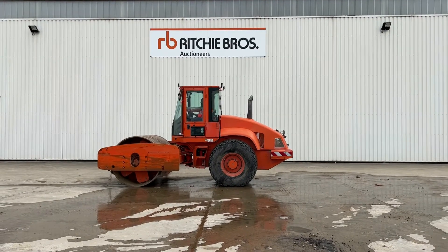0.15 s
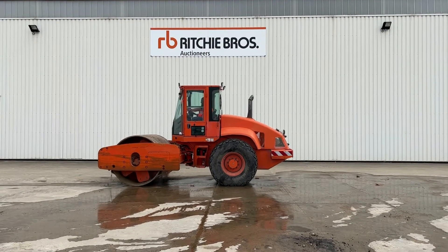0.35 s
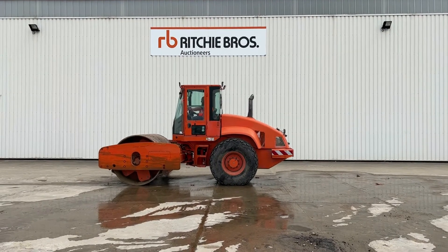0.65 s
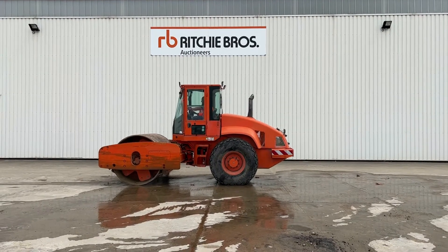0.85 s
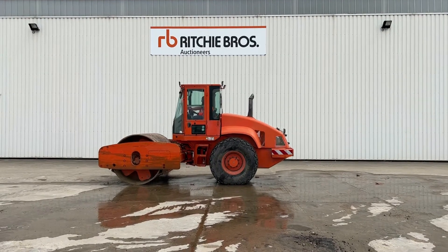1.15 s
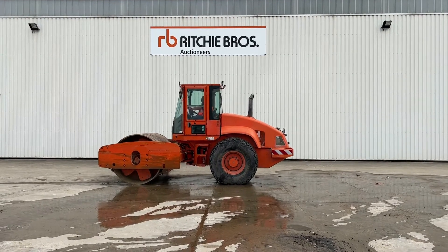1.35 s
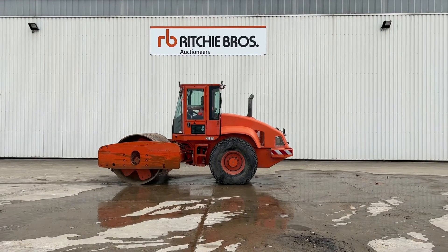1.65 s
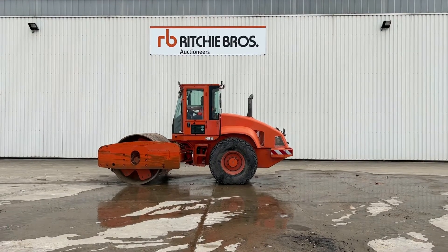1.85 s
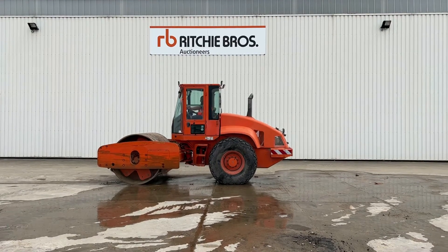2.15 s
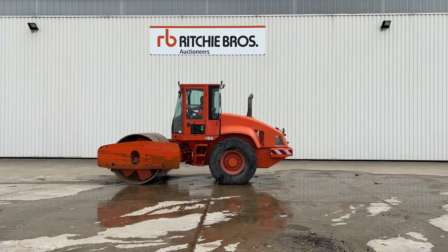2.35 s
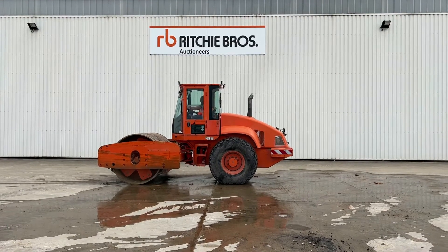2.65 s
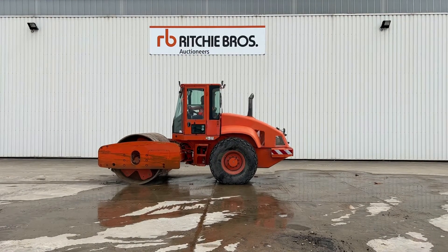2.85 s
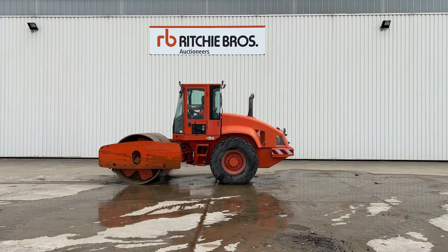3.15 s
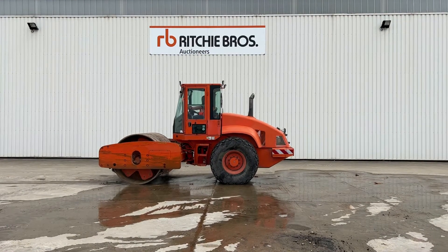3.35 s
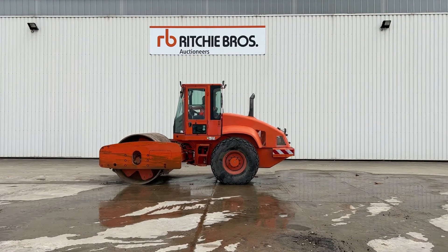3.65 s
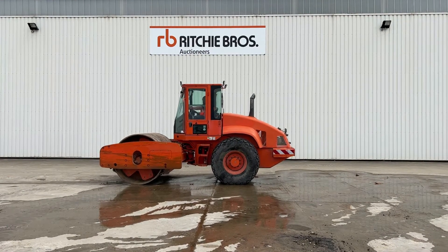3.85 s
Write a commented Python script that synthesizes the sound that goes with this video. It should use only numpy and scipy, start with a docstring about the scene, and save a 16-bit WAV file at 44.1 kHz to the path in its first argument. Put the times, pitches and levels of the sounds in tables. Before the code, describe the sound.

A road roller's steel drum rumbles, rings and clanks across gritty wet concrete outdoors, over a throbbing diesel engine and a thin pump whine. Near the end a stone snaps and the rolling fades to a quiet, humming idle.

```python
"""A heavy roller creeps across a wet concrete yard and stops. From the start, grit shakes its steel drum
so that it rumbles, grinds and rings, while the diesel engine knocks and the drive pump whines.
Along the way wet grit crunches, the engine's throb gives low thuds, and the drum clanks over ridges.
Just after three seconds an idle hum comes in and a stone snaps. The rolling and then the whine
fade away, leaving the hum and the quietly knocking engine."""
import sys
import numpy as np
from scipy import signal
from scipy.fft import rfft, irfft, next_fast_len
from scipy.io import wavfile
from scipy.ndimage import uniform_filter1d, map_coordinates

SR = 44100
rng = np.random.default_rng(int(sys.argv[2]) if len(sys.argv) > 2 else 0)


def put_to_file(sound):
    """Save the sound as 16-bit audio at rate SR, in the file named by the first command-line argument."""
    columns = np.atleast_2d(sound).T  # one column per channel
    safe = np.clip(columns, -1, 1)
    whole_steps = np.round(safe * 32767)
    wavfile.write(sys.argv[1], SR, whole_steps.astype(np.int16))


N = 176400
TIME = np.arange(N) / SR

# How loud the drum's sounds are. Each row: time in seconds, level in dB.
RUMBLE_LEVELS = [(0.03, -20.5), (0.87, -23.5), (0.9, -22), (0.98, -29), (1.0, -19), (1.12, -22.5),
                 (1.8, -21.5), (2.45, -21.5), (2.55, -25), (2.7, -21.5), (2.77, -25.5), (3.2, -22.5),
                 (3.41, -32), (3.75, -46)]
GRIND_LEVELS = [(0.03, -16.5), (0.09, -20.5), (0.1, -21), (0.17, -22), (0.22, -17.5), (0.27, -23),
                (0.33, -21), (0.4, -23), (0.41, -23.5), (0.83, -22.5), (0.98, -28.5), (1.01, -23.5),
                (1.32, -24.5), (1.36, -31.5), (1.5, -23.5), (1.62, -26), (1.66, -23), (1.68, -24.5),
                (1.89, -24), (1.97, -26), (2.19, -28), (2.45, -23.5), (2.59, -27), (2.67, -24.5),
                (2.7, -21), (2.83, -29), (2.93, -25.5), (2.96, -22.5), (3.14, -30.5), (3.25, -29.5),
                (3.39, -39.5), (3.75, -34)]
RATTLE_LEVELS = [(0.03, -32), (0.36, -37.5), (0.39, -44), (0.41, -36), (0.56, -40.5), (0.57, -29),
                 (0.61, -37), (0.84, -36), (0.97, -47.5), (1.91, -39), (2.16, -42.5), (2.48, -35.5),
                 (2.54, -41), (2.68, -42.5), (2.69, -45), (2.78, -46), (2.98, -37.5), (3.4, -50.5)]
MAIN_RING_LEVELS = [(0.03, -18), (0.05, -23), (0.09, -12), (0.14, -11), (0.29, -21), (0.36, -15),
                    (0.4, -28), (0.51, -18), (0.58, -18), (0.63, -26), (0.68, -15), (0.74, -13),
                    (0.81, -23), (0.87, -14), (0.91, -14), (0.96, -26), (1.01, -21), (1.04, -40),
                    (1.1, -23), (1.21, -25), (1.23, -31), (1.27, -18), (1.32, -30), (1.36, -23), (1.5, -18),
                    (1.54, -26), (1.66, -29), (1.69, -21), (1.74, -28), (1.79, -18), (1.83, -29),
                    (1.91, -17), (1.98, -17), (2.06, -31), (2.15, -20), (2.26, -23), (2.29, -30),
                    (2.38, -19), (2.41, -26), (2.48, -15), (2.58, -33), (2.65, -20), (2.67, -23),
                    (2.72, -13), (2.76, -15), (2.8, -28), (2.84, -22), (2.9, -29), (3.07, -14), (3.13, -27),
                    (3.19, -21), (3.23, -33), (3.26, -22), (3.29, -24), (3.33, -34), (3.39, -29),
                    (3.58, -53), (3.66, -42), (3.71, -56), (3.75, -46)]
# The drum's three higher rings. Each row: time in seconds, then the level of each in dB.
HIGH_RING_LEVELS = [(0.029, -19, -58, -55), (0.12, -53, -26, -27), (0.17, -22.5, -51, -49),
                    (0.22, -25, -23, -54), (0.27, -22, -55, -31), (0.29, -19, -44, -33),
                    (0.41, -38.5, -46, -39.5), (0.73, -29, -42, -36), (0.99, -36, -51, -54),
                    (1.02, -40, -51, -40), (1.28, -31, -37.5, -35.5), (1.36, -42, -46, -45),
                    (1.46, -31.5, -42, -36), (1.59, -44, -32, -58), (1.65, -28, -53, -28),
                    (1.72, -24.5, -53, -42), (1.82, -32.5, -32, -35.5), (2.03, -31.5, -54, -47),
                    (2.15, -48, -45, -39.5), (2.31, -30, -32, -42), (2.44, -37, -32, -34.5),
                    (2.7, -33, -36.5, -38.5), (2.95, -39.5, -33, -41), (3.01, -29, -33.5, -61),
                    (3.44, -48, -39.5, -71), (3.75, -66, -67, -54)]

# The tone colour of each sound. Each row: frequency in Hz, relative level in dB.
RUMBLE_COLOUR = [(13, -51), (22, -44), (36, -1), (59, 1), (103, 0), (166, -0.5), (200, -15.5), (260, -13),
                 (440, -120)]
GRIND_COLOUR = [(150, -6), (195, 8.5), (225, 5), (245, 1.5), (285, 5.5), (500, -6), (800, -5),
                (1100, -12.5), (1250, -19.5), (1600, -52), (2500, -66), (4000, -120)]
RATTLE_COLOUR = [(900, -55), (1200, -9), (1350, 4), (1600, -9), (1900, -2.5), (2200, -8.5), (3000, -26),
                 (5000, -88)]
ENGINE_COLOUR = [(20, -46), (60, -20), (150, -8), (300, -8), (600, 3.5), (1050, -14.5), (1200, -20),
                 (1650, -15), (2100, -23.5), (3500, -42), (8000, -62), (12000, -120)]
AIR_COLOUR = [(20, -56), (60, -1.5), (300, -6), (700, -14), (1050, -10.5), (1200, -14), (1700, -10.5),
              (2200, -18), (2600, -19.5), (3200, -26.5), (5000, -27), (5800, -32.5), (7400, -35),
              (11000, -34.5), (16000, -36)]
GRIT_COLOUR = [(1000, -41), (2000, 1.5), (3000, 0.5), (4500, 1.5), (6000, -3.5), (8000, -10),
               (11000, -10.5), (16000, -23)]
CLANK_COLOUR = [(300, -25), (600, 5), (900, 1), (1400, 5), (1900, -2.5), (2400, -8), (3500, -14.5),
                (7000, -66)]
STONE_COLOUR = [(1200, -20), (2200, -4), (3300, 0), (4300, -4), (6000, -5), (9000, -7), (11000, -10),
                (16000, -16)]
TREBLE_COLOUR = [(7400, 0), (8400, 6.5), (9600, -3), (10200, -20), (10700, 0), (12800, -4.5), (13800, -26),
                 (14800, -6.5), (16000, -10)]

# Modes are the pitches a thing rings at. Each row: pitch in Hz, width in Hz, strength in dB.
LOW_DRUM_MODES = [(69.8, 7.7, 6), (102, 13, -0.5), (134, 28, -9.5)]
DRUM_MODES = [(473, 5.9, 4), (553.7, 5.9, 10.5), (642, 22, 4), (767, 3.3, -7), (944, 12.3, 5.5),
              (996, 6.6, 1), (1036, 2.7, -1.5), (1118, 29, 4.5), (1336, 36, -2), (1470, 65, 0.5),
              (1809, 33, 7.5)]
ENGINE_MODES = [(425, 12, 8), (902, 15, 7), (1045, 30, 9), (1303, 12, 9), (1553, 12, 9), (1667, 14, 9),
                (3915, 15, 9)]
STONE_MODES = [(3400, 900, 3)]

# The strengths of the engine's four firings over two turns of its shaft.
FIRING_STRENGTHS = [1, .5, .9, .55]
# Tones of the shaft and the idling hydraulics. Each row: multiple of the base pitch, level in dB.
ENGINE_TONES = [(47, -55), (54, -52), (55, -54), (68, -56), (81, -54), (87, -53), (91, -56), (204, -68)]
HUM_TONES = [(1, -39), (2, -52), (3, -50), (5, -54)]
# The drive pump's tones. Each row: pitch in Hz, level in dB.
WHINE_TONES = [(2338, -60), (3342, -71), (3676, -70), (5012, -73), (10706, -82)]

# Wet grit is crushed. Each row: middle of the burst in seconds, level in dB, length in seconds.
CRUNCHES = [(0.094, -47, 0.046), (0.166, -46, 0.024), (0.264, -45.5, 0.02), (0.649, -51, 0.064),
            (.68, -63, 0.021), (0.753, -45.5, 0.038), (0.853, -46.5, 0.045), (1.11, -62, 0.013),
            (1.373, -53, 0.026), (2.375, -50, 0.017), (2.424, -55, 0.012), (2.5, -50.5, 0.045),
            (2.73, -62, 0.28), (3.0, -55, 0.033), (3.136, -51, 0.062)]
# The loudest beats of the engine's low throb. Each row: start in seconds, level in dB, pitch in Hz.
THROB_THUDS = [(0.093, -19, 101.4), (0.268, -14, 73), (0.417, -17, 60), (0.629, -19, 63), (1.002, -14, 64),
               (1.589, -18.5, 66.3), (1.801, -16, 61.4), (2.048, -15, 66), (2.216, -20, 88),
               (2.309, -17, 98), (2.38, -15, 64.7), (2.638, -13, 65), (2.691, -17, 60.4), (2.846, -18, 74),
               (2.938, -9, 69), (3.164, -19, 61.9)]
# The drum hits a ridge. Each row: start in seconds, level in dB, seconds to fade by 60 dB.
RIDGES = [(.102, -23, 0.056), (0.203, -24, 0.097), (.253, -26.5, 0.14), (.298, -27, 0.18),
          (0.468, -34, .08), (.573, -30, 0.1), (.735, -32, 0.088), (1.094, -34, .08), (1.638, -30.5, 0.17),
          (2.419, -24.5, 0.078), (2.682, -26, 0.16), (2.723, -33, 0.13), (2.946, -26.5, 0.086)]
# A stone snaps. Each row: start in seconds, strength in dB.
SNAPS = [(3.2134, -14)]

# How alike left and right are. Each row: frequency in Hz, likeness (1 means the same).
LIKENESS = [(30, 0.96), (60, 1), (180, 1), (300, 0.96), (520, 0.88), (900, 0.88), (1500, 0.7), (2600, .55),
            (5000, 0.66), (9000, .15), (13000, 0.15)]
# Which side is louder. Each row: frequency in Hz, left over right in dB.
BALANCE = [(60, 0), (130, -2), (600, -1.5), (2000, -1), (4000, 1.9), (8000, 0.5), (12000, -0.5)]

RING_HZ = (235, 345, 424, 843)
SHAFT_HZ, THROB_HZ, HUM_HZ, TOP_HZ = 19.17, 18.92, 158.3, 15780
STOP_S, STOP_FADE_S = 3.17, 0.64
ROLLING = np.clip(1 - (TIME - STOP_S) / STOP_FADE_S, 0, 1)  # 1 while the drum turns, 0 at rest


def amp(db):
    return 10 ** (np.asarray(db) / 20)


def unit(x):
    """Scale x to an average (rms) level of 1."""
    return x / np.sqrt(np.mean(x ** 2) + 1e-20)


def along(points, hz):
    """Read a frequency table between its rows."""
    freqs, values = np.transpose(points)
    return np.interp(np.log(hz + 1), np.log(freqs + 1), values)


def curves(rows):
    """Turn each column after the time into one value per sample."""
    times, *columns = np.transpose(rows)
    return [np.interp(TIME, times, column) for column in columns]


def wobble(rate):
    """A smooth random curve through rate points a second."""
    return map_coordinates(rng.standard_normal(int(N * rate / SR) + 4), [TIME * rate])


def noise():
    """Two unrelated noises: one for the middle, one for the sides."""
    return rng.standard_normal((2, N))


def patchy_noise(depth_db):
    """Noise whose bands swell and dip on their own."""
    bands = signal.stft(noise(), nperseg=1024)[2]
    patches = uniform_filter1d(rng.standard_normal(bands.shape[1:]), size=7, axis=0)
    patches = unit(uniform_filter1d(patches, size=5, axis=1))
    return unit(signal.istft(bands * amp(depth_db * patches), nperseg=1024)[1][:, :N])


def filtered(x, response):
    """Multiply each frequency in x by response(frequency)."""
    size = next_fast_len(N + SR // 2)
    return irfft(rfft(x, size) * response(np.fft.rfftfreq(size, 1 / SR)), size)[..., :N]


def coloured(x, colour):
    """Give x a tone colour and a level of 1."""
    return unit(filtered(x, lambda f: amp(along(colour, f))))


def body(x, colour, modes):
    """Pass x through a ringing object; plain noise keeps its level."""
    def response(f):
        peaks = sum(amp(db) * 1j * f * width / (hz * hz - f * f + 1j * f * width)
                    for hz, width, db in modes)
        shape = amp(along(colour, f)) * (1 + peaks)
        return shape / np.sqrt(np.mean(np.abs(shape) ** 2))
    return filtered(x, response)


def tones(rows, drift):
    """Steady tones that waver a little in pitch and level."""
    mid = sum(np.sqrt(2) * amp(db + wobble(6.15)) * np.sin(2 * np.pi * hz * TIME + drift * wobble(8))
              for hz, db in rows)
    return np.array([mid, np.roll(mid, 7)])


def struck(start, db, fade_s, rise_s):
    """The loudness of a blow: it rises fast, then falls 60 dB in fade_s."""
    age = np.clip(TIME - start, 0, None)
    return amp(db - 60 * age / fade_s) * (1 - np.exp(-age / rise_s))


def drum_rumble():
    """The rolling drum rumbles, swelling as the engine shakes the frame once a turn."""
    shaking = noise() * amp(curves(RUMBLE_LEVELS)[0] + 0.35 * wobble(23)) * ROLLING
    throb = 1 + 0.55 * np.cos(2 * np.pi * THROB_HZ * (TIME - 0.0088))
    return body(shaking, RUMBLE_COLOUR, LOW_DRUM_MODES) * throb


def drum_grind():
    """Grit scrapes the steel shell: a grinding with a brighter rattle on top."""
    grind = noise() * amp(curves(GRIND_LEVELS)[0] + 0.59 * wobble(18)) * ROLLING
    rattle = patchy_noise(depth_db=0.8) * amp(curves(RATTLE_LEVELS)[0] - 2.5) * ROLLING
    return body(grind, GRIND_COLOUR, DRUM_MODES) + body(rattle, RATTLE_COLOUR, DRUM_MODES)


def drum_rings():
    """The shell rings at four pitches, which waver as the grit keeps shaking it."""
    rings = np.zeros((2, N))
    for hz, db in zip(RING_HZ, curves(MAIN_RING_LEVELS) + curves(HIGH_RING_LEVELS)):
        drift = 1.2 * np.array([wobble(10), wobble(14)])
        rings += np.sqrt(2) * amp(db) * np.sin(2 * np.pi * hz * TIME + drift)
    return rings


def diesel(knock_db=-46, scatter_db=2, fade_s=0.05):
    """Two firings a turn knock on the engine block, over tones that follow the shaft."""
    count = np.arange(int(2 * SHAFT_HZ * N / SR))
    starts = (count * SR / (2 * SHAFT_HZ)).astype(int)
    scatter = amp(scatter_db * rng.standard_normal(len(count)))
    firings = np.zeros(N)
    firings[starts] = np.take(FIRING_STRENGTHS, count % 4) * scatter
    age = TIME[:SR // 8]
    one_knock = rng.standard_normal((2, len(age))) * amp(-60 * age / fade_s)
    knocks = signal.fftconvolve(firings[None], one_knock, axes=1)[:, :N]  # a copy at every firing
    shaft = tones([(k * SHAFT_HZ, db) for k, db in ENGINE_TONES], drift=1.0)
    return amp(knock_db) * unit(body(knocks, ENGINE_COLOUR, ENGINE_MODES)) + shaft


def cooling_air(level_db=-39):
    """Rushing air pulses gently with each turn of the shaft."""
    pulse = 1 + 0.095 * np.sin(2 * np.pi * SHAFT_HZ * TIME)
    return amp(level_db + 0.45 * wobble(5.19)) * pulse * coloured(noise(), AIR_COLOUR)


def pump_whine(fade_start_s=3.47, fade_s=0.5):
    """The drive pump whines, then fades as the roller slows."""
    driving = np.clip(1 - (TIME - fade_start_s) / fade_s, 0, 1)
    return driving * tones(WHINE_TONES, drift=1.03)


def wet_crunch(roughness_db=2.1):
    """Wet grit crunches in bursts, over a faint hiss that follows the grinding."""
    bursts = sum(amp(db) * np.exp(-2 * ((TIME - middle) / length) ** 2)
                 for middle, db, length in CRUNCHES)
    hiss = amp(curves(GRIND_LEVELS)[0] - 29) * ROLLING
    grains = noise() * amp(roughness_db * wobble(300))
    return (bursts + hiss) * coloured(grains, GRIT_COLOUR)


def thuds():
    """The loudest beats of the engine's throb each give a short, low thud."""
    notes = sum(struck(start, db, fade_s=0.27, rise_s=0.011) * np.sin(2 * np.pi * hz * (TIME - start))
                for start, db, hz in THROB_THUDS)
    return np.array([notes, notes])


def clanks():
    """Each ridge strikes the drum and makes its shell ring."""
    blows = sum(struck(start, db, fade_s, rise_s=0.0012) for start, db, fade_s in RIDGES)
    return body(noise() * blows, CLANK_COLOUR, DRUM_MODES)


def idle_hum(start_s=3.07, rise_s=0.45):
    """The hydraulics begin to hum as they go idle."""
    idling = np.clip((TIME - start_s) / rise_s, 0, 1)
    return idling * tones([(k * HUM_HZ, db) for k, db in HUM_TONES], drift=0.25)


def stone_snap():
    """A stone breaks: one sharp click, then a short, softer splintering."""
    snap = noise() * sum(struck(start, db - 19.5, fade_s=0.014, rise_s=0.00016) for start, db in SNAPS)
    for start, db in SNAPS:
        snap[0, round(start * SR)] = amp(db)  # the click, in the middle only
    return body(snap, STONE_COLOUR, STONE_MODES)


def scene():
    """Add up the sounds and spread them left and right, less alike in the treble."""
    mix = drum_rumble() + drum_grind() + drum_rings() + diesel() + cooling_air() + pump_whine()
    mix += wet_crunch() + thuds() + clanks() + idle_hum() + stone_snap()
    mid = mix[0]
    side = filtered(mix[1], lambda f: np.tan(np.arccos(along(LIKENESS, f)) / 2))
    left_right = np.array([mid + side, mid - side])
    return filtered(left_right, lambda f: amp(along(BALANCE, f) * np.array([[0.5], [-0.5]])))


def record(dry):
    """The treble has a lift near 8.4 kHz, two narrow dips, and nothing above TOP_HZ."""
    return filtered(dry, lambda hz: amp(along(TREBLE_COLOUR, hz)) * (hz < TOP_HZ))


dry = scene()
out = record(dry)
put_to_file(out)
```